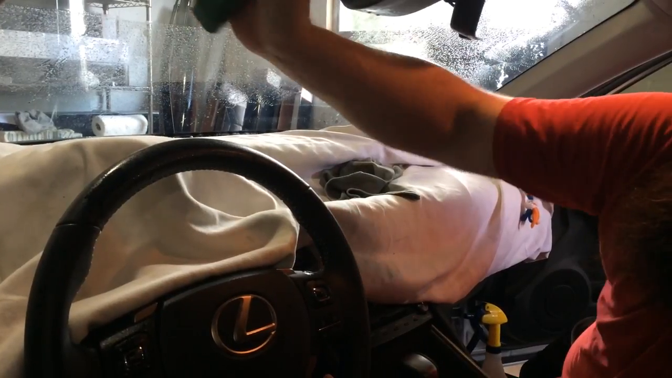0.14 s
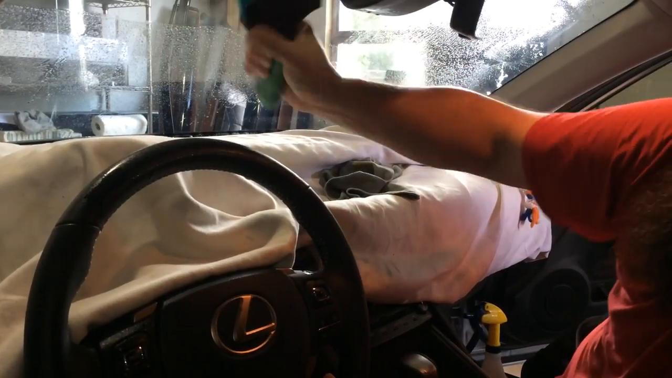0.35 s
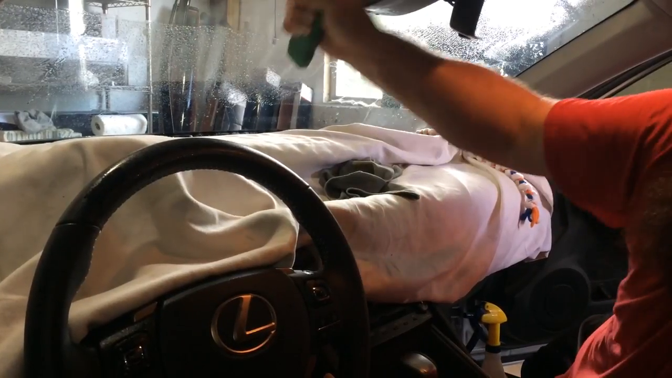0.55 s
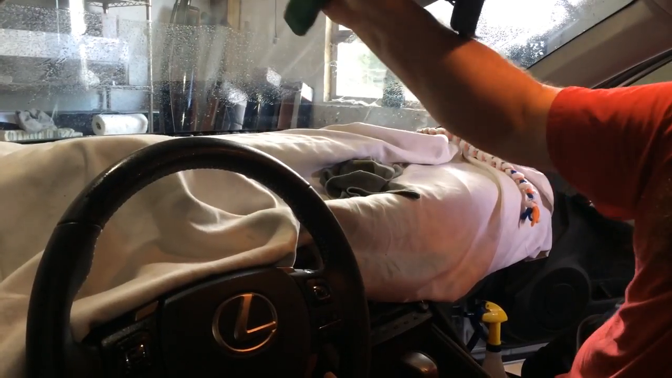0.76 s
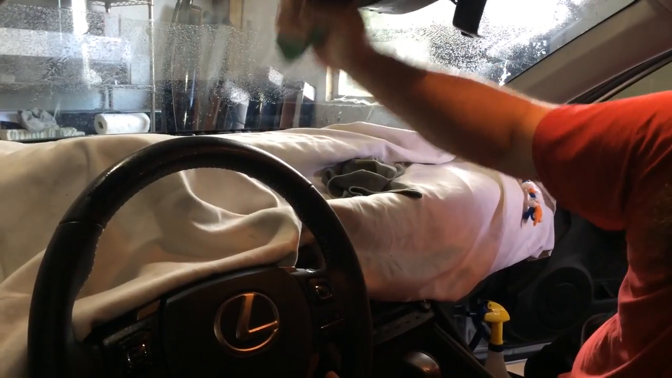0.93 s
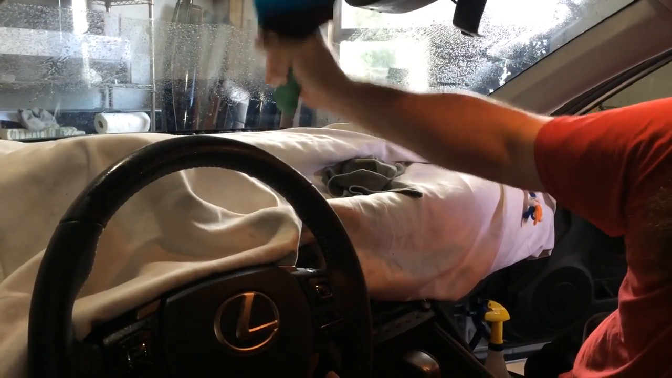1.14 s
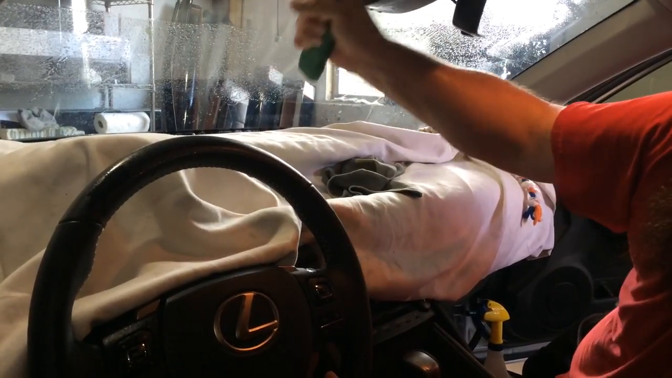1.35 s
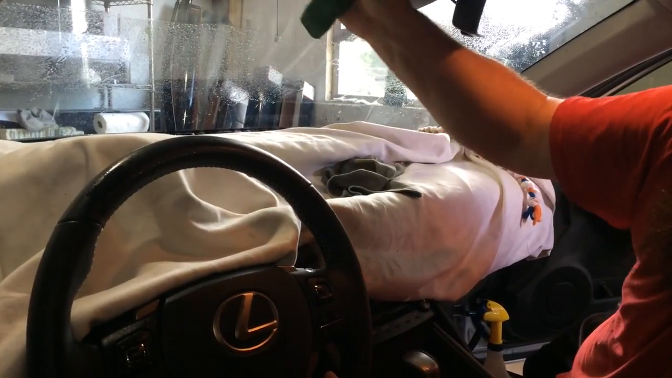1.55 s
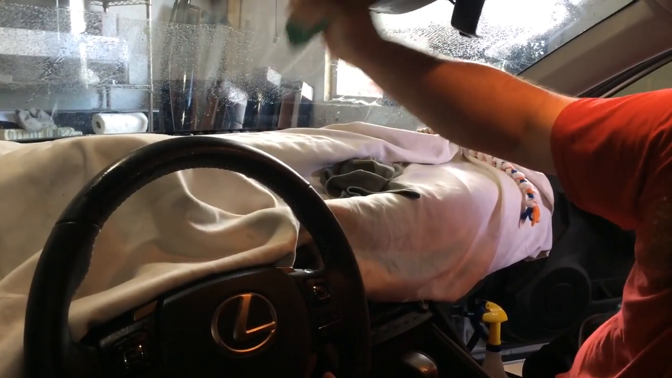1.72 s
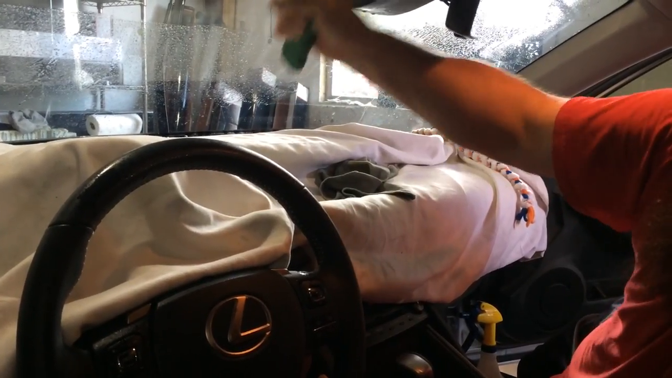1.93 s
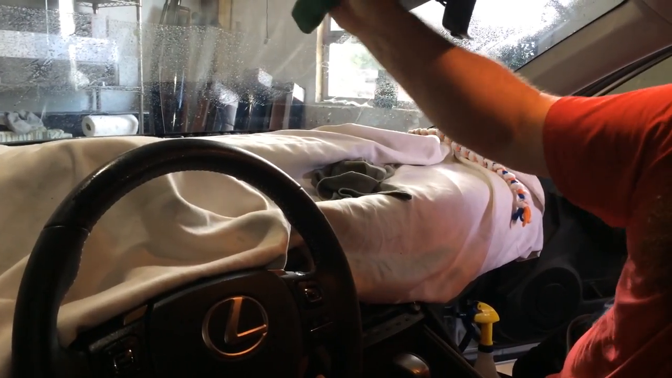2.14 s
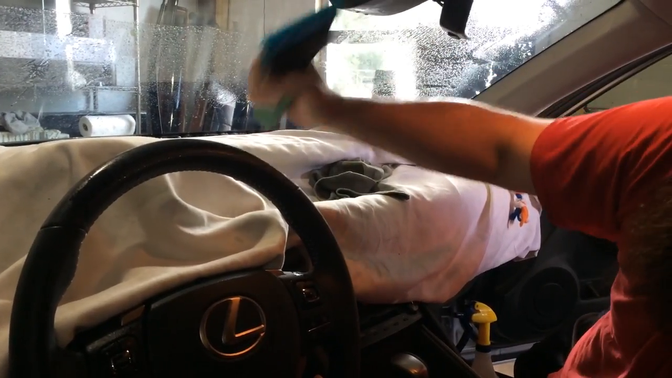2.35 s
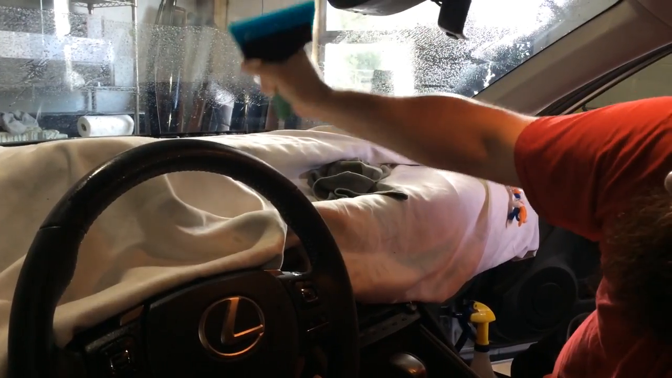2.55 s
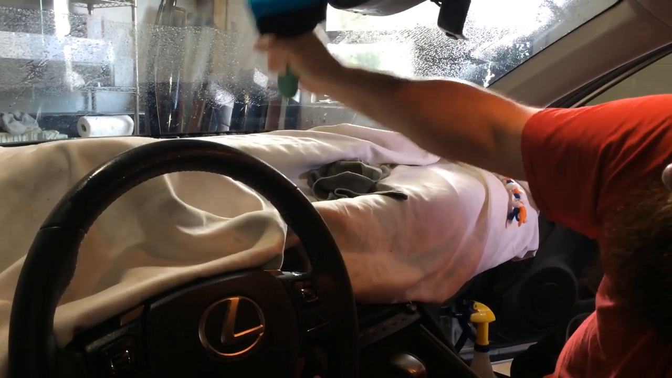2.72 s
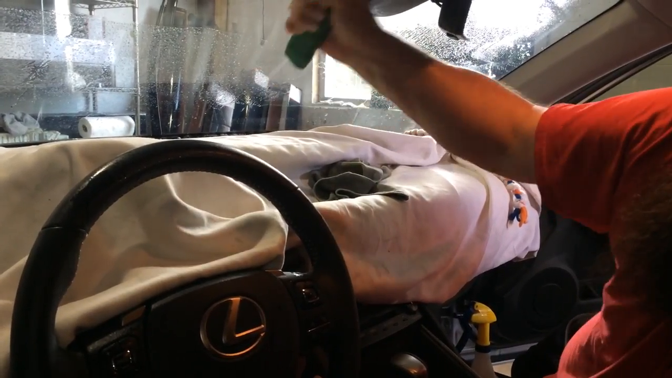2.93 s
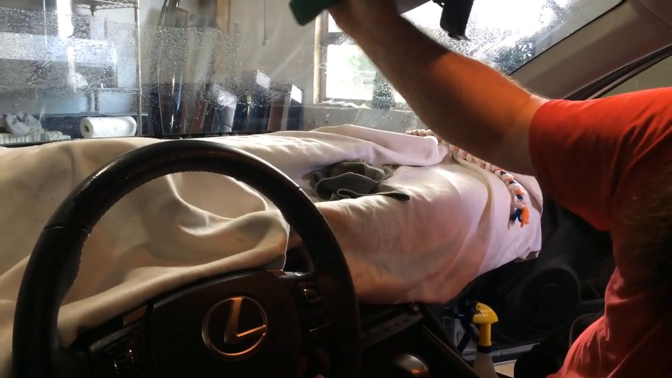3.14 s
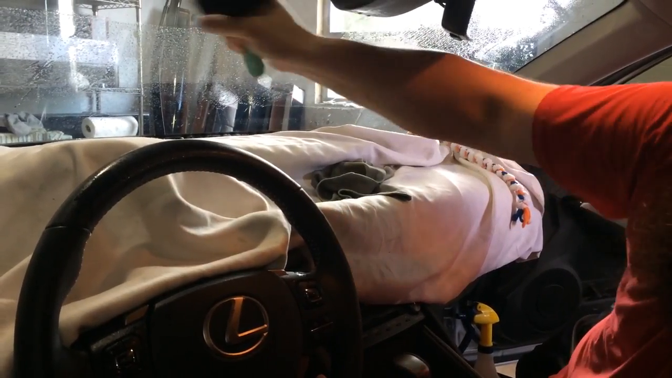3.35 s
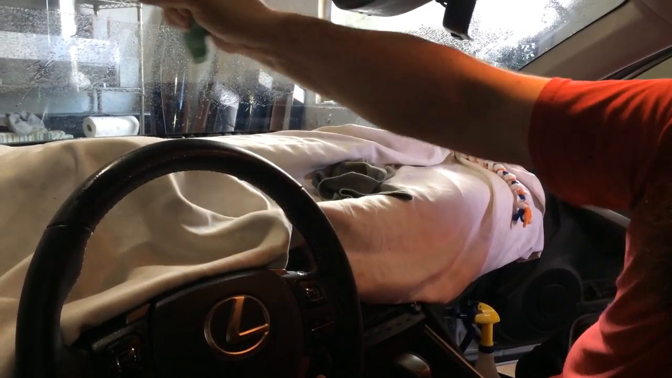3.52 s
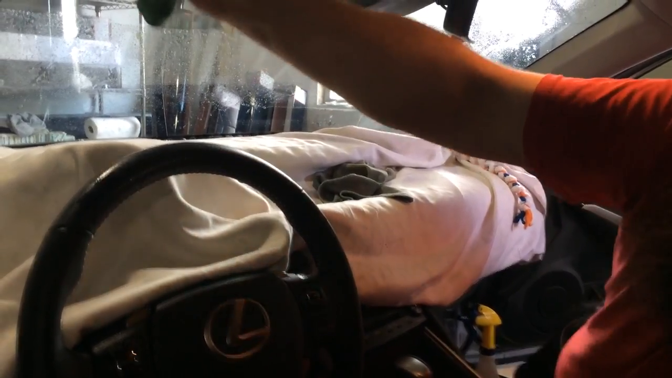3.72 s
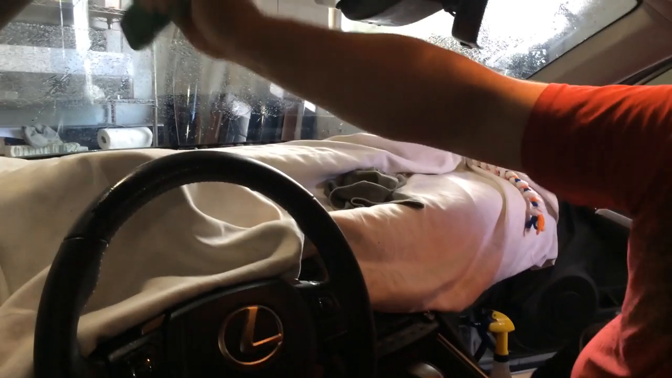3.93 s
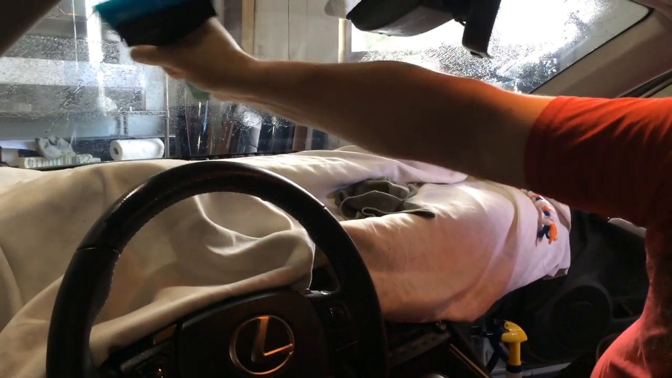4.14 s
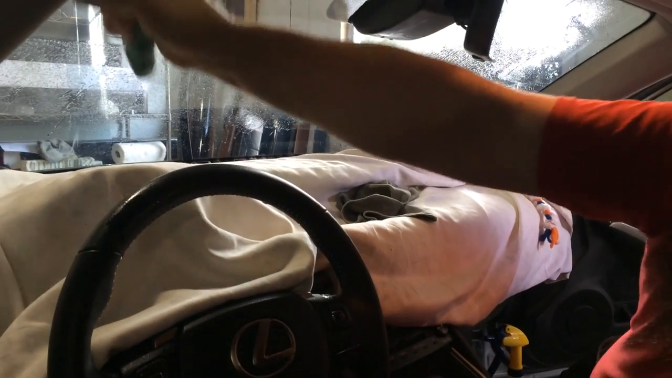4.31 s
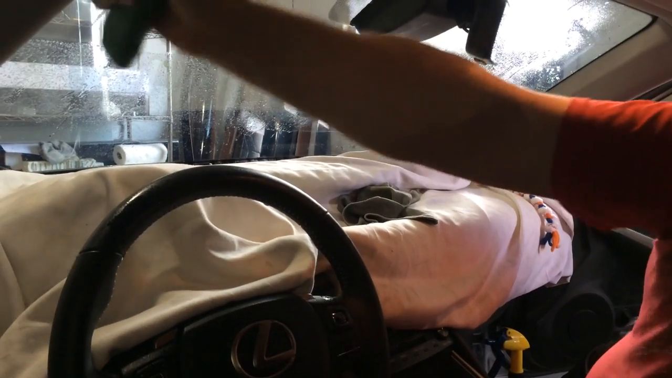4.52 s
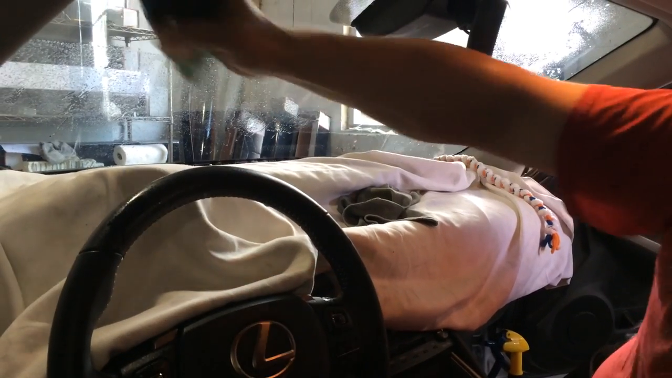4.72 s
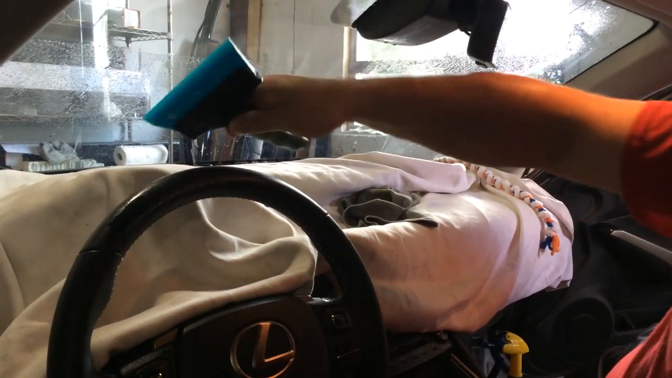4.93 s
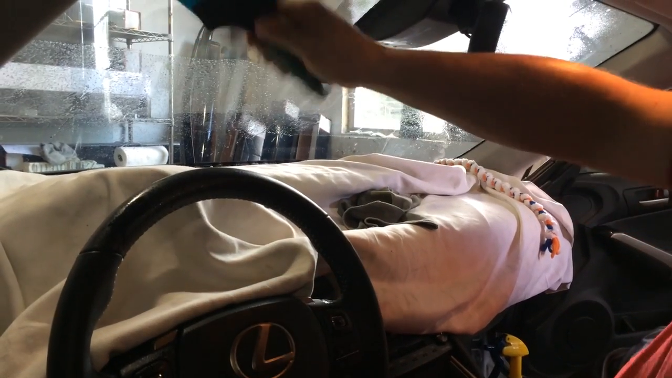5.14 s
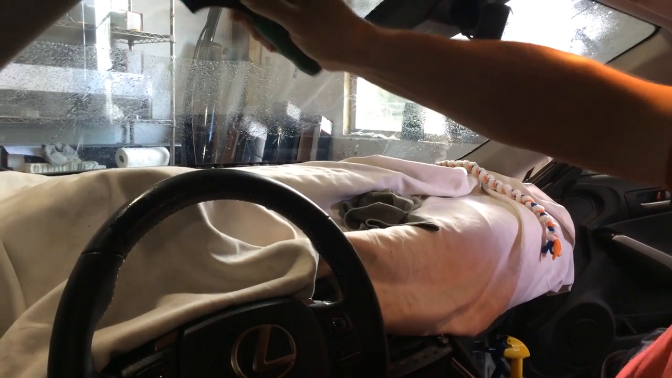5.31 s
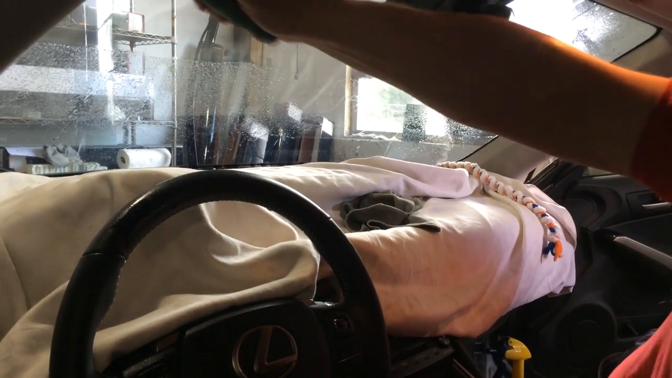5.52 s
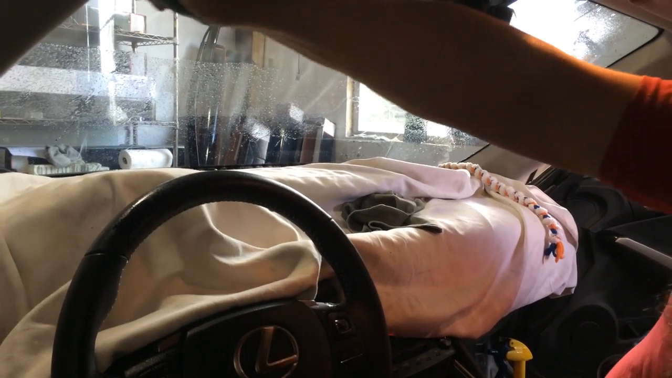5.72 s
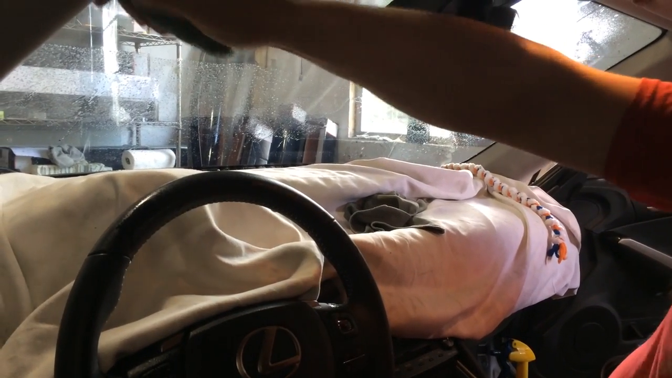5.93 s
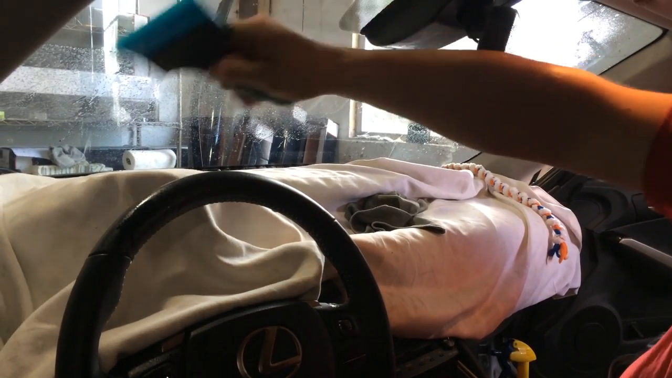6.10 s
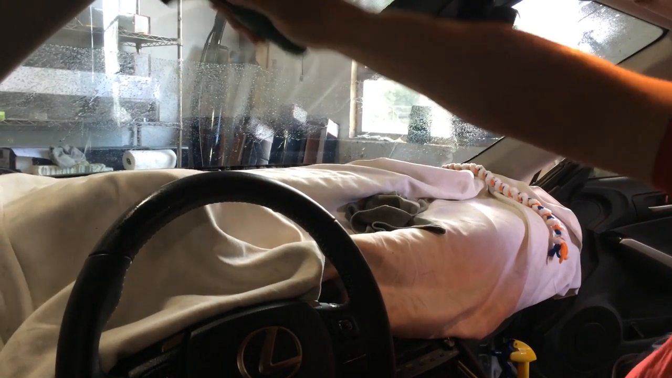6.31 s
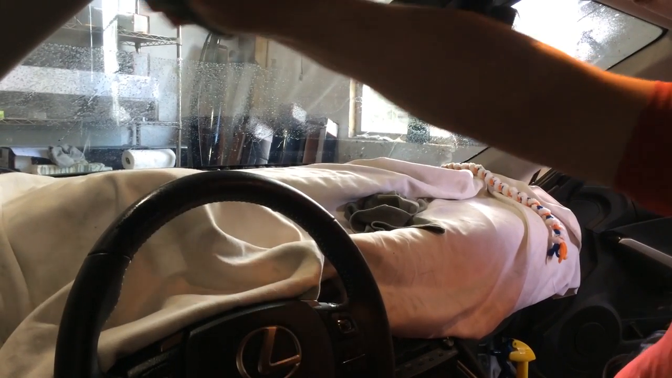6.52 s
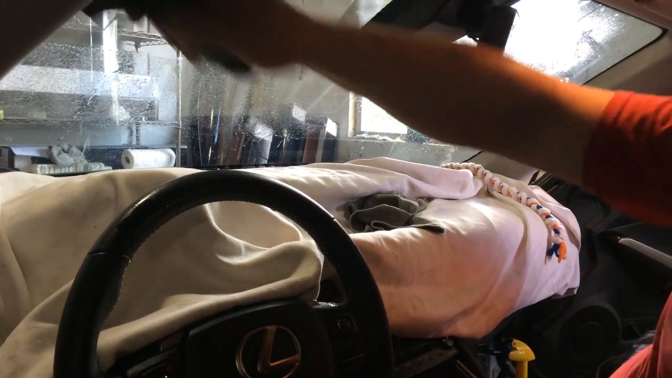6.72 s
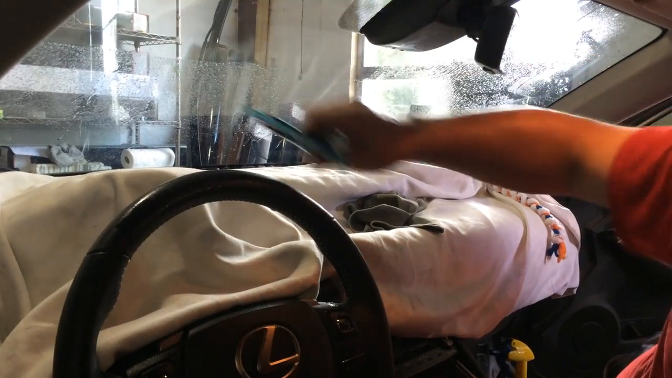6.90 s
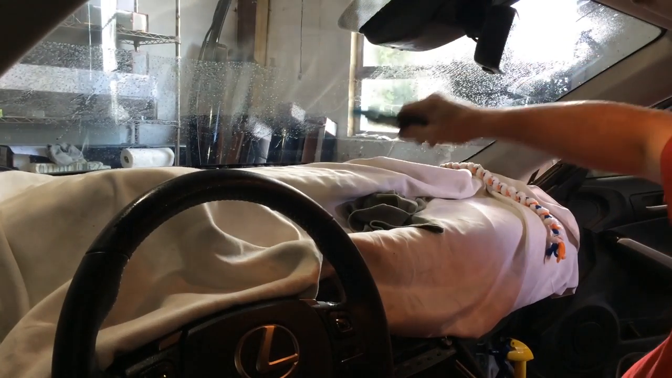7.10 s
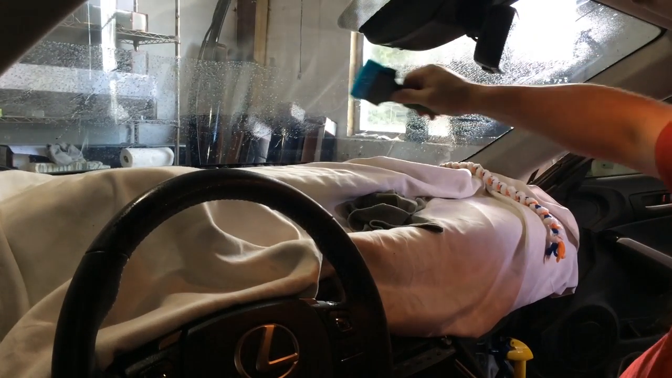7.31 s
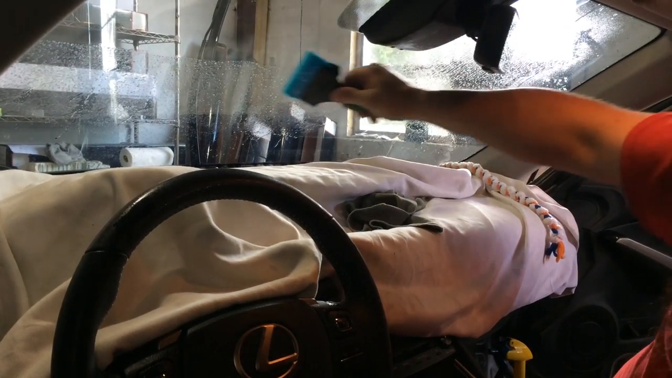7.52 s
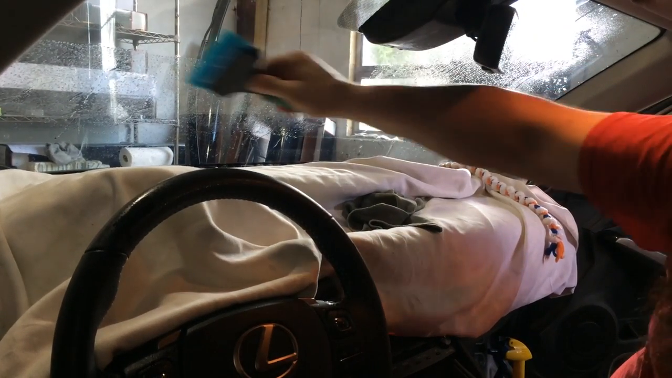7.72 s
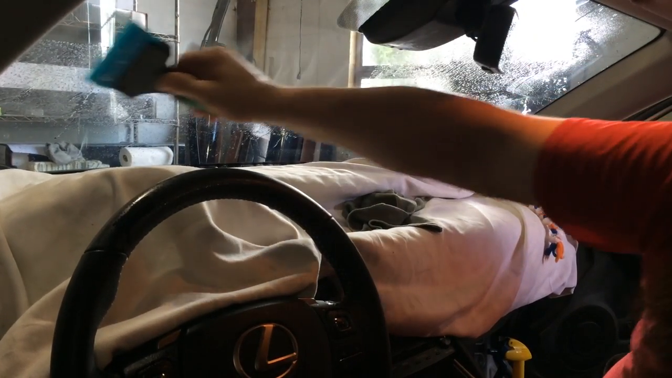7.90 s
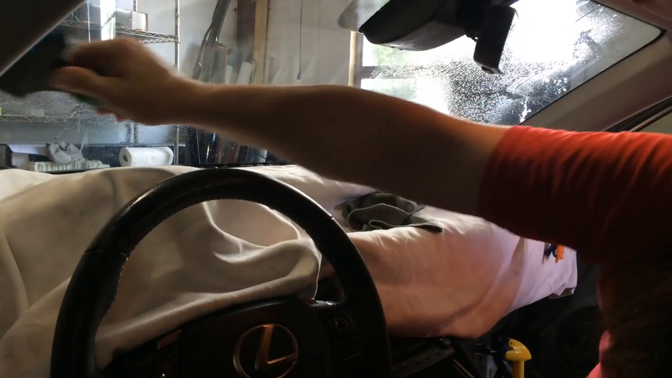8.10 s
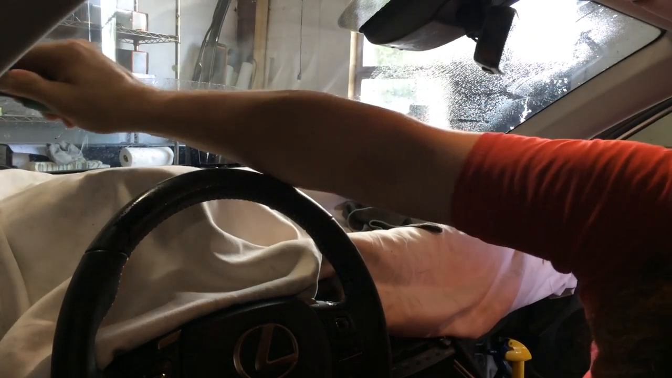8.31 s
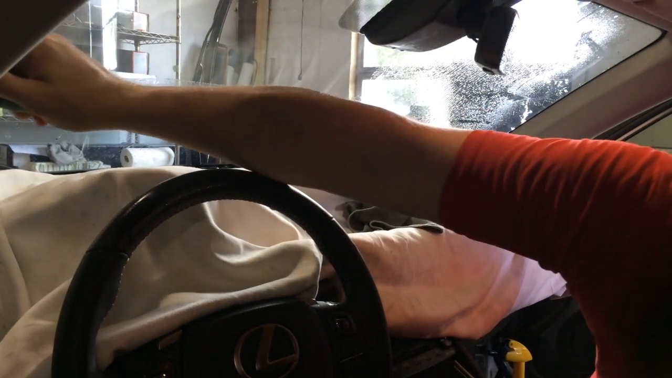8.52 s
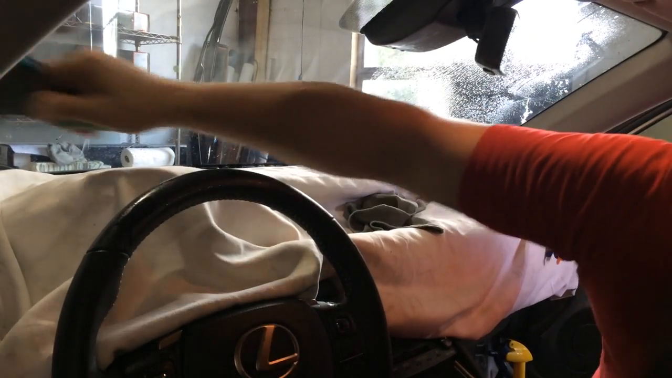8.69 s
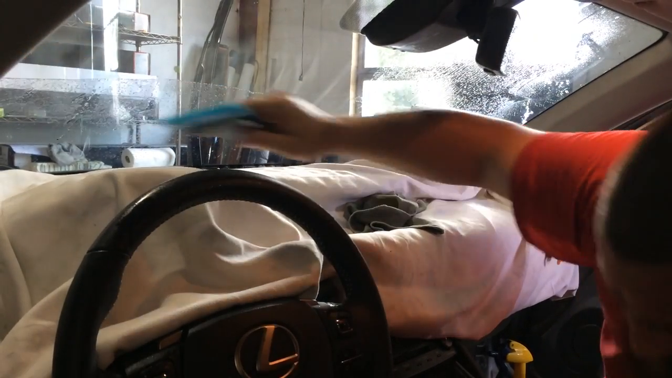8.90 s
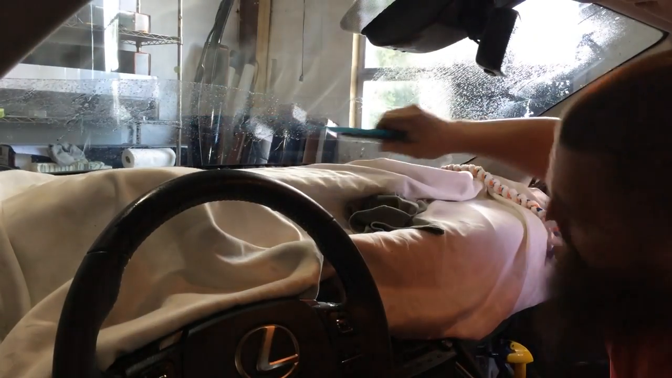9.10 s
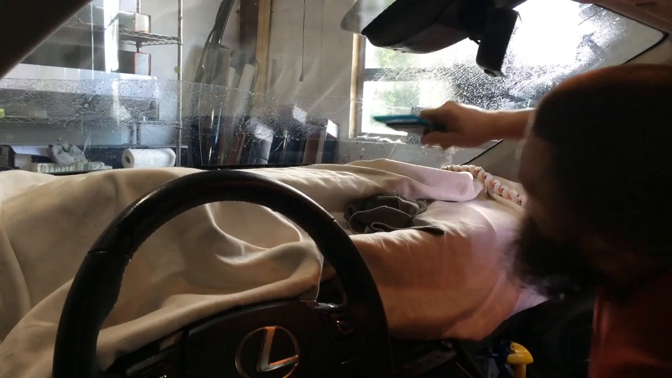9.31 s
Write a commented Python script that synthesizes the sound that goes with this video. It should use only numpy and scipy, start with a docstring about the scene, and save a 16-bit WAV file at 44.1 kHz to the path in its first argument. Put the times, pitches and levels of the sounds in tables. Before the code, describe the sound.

A squeegee taps and thuds on a wet car windshield, swishing and squeaking faintly between strokes over a low fan hum.

```python
"""Squeegee on a windshield, from inside the car

The microphone is in a parked car, where a hand squeegee presses water out from under window film.
Each stroke starts with the hard blade tapping the glass, which thuds into the cabin; then the blade
swishes, judders and squeaks over the wet film. At the end a shirt brushes close to the microphone.
Farther off, a fan hums in the workshop around the car, and the room answers each tap faintly."""
import sys
import numpy as np
from scipy import signal
from scipy.fft import rfft, irfft, next_fast_len
from scipy.io import wavfile
from scipy.ndimage import uniform_filter1d, map_coordinates

SR = 44100
rng = np.random.default_rng(int(sys.argv[2]) if len(sys.argv) > 2 else 0)


def digitize_waveform(pressure):
    """Quantize a signal to 16-bit integers and store it at the path in sys.argv[1].

    Rows of a 2-D input are taken as channels; values are limited to [-1, 1].
    """
    field = np.atleast_2d(pressure).T
    bounded = np.clip(field, -1, 1)
    quanta = np.round(bounded * 32767).astype(np.int16)
    wavfile.write(sys.argv[1], SR, quanta)


N = 412335


def amp(db):
    """Decibels to gain."""
    return 10 ** (np.asarray(db) / 20)


def unit(x):
    """Scale to rms 1."""
    return x / np.sqrt(np.mean(x ** 2) + 1e-20)


def burst(x):
    """Scale a short sound to the energy of 10 ms at rms 1."""
    return x * np.sqrt(SR / 100 / np.sum(x ** 2))


def along(points, hz):
    """Read (frequency, value) points on a log axis."""
    freqs, values = np.transpose(points)
    return np.interp(np.log(hz + 1), np.log(freqs), values)


def tilted(points, slope_db=0):
    """Gain of a spectrum leaned by slope_db per octave above about 1 kHz."""
    return lambda hz: amp(along(points, hz) + slope_db * np.log2(1 + hz / 1000))


def resonant(peaks):
    """Response of a body with resonances (frequency [Hz], width [Hz], level [dB])."""
    return lambda f: sum((-1) ** k * amp(db) * 1j * f * width / (hz * hz - f * f + 1j * f * width)
                         for k, (hz, width, db) in enumerate(peaks))


def filtered(x, response):
    """Pass x through a frequency response."""
    size = next_fast_len(len(x) + SR // 8)
    return irfft(rfft(x, size) * response(np.fft.rfftfreq(size, 1 / SR)), size)[:len(x)]


def noise(n, response):
    """Coloured noise at rms 1."""
    return unit(filtered(rng.standard_normal(n), response))


def causal(x, gain, size=4096):
    """Colour x without any sound ahead of its onset."""
    cepstrum = irfft(np.log(gain(np.fft.rfftfreq(size, 1 / SR)) + 1e-6))
    cepstrum[1:size // 2] *= 2
    cepstrum[size // 2 + 1:] = 0
    return signal.fftconvolve(x, irfft(np.exp(rfft(cepstrum))))[:len(x)]


def wobble(rate):
    """A smooth random curve, rate knots a second."""
    return map_coordinates(rng.standard_normal(int(N * rate / SR) + 4), [np.arange(N) * rate / SR])


def scattered(per_s, db, spread_db):
    """Rows (time [s], level [dB]) of small events at loosely even, random times."""
    draws = enumerate(rng.random(size=(64, 2)))
    return [((k + u) / per_s, db + spread_db * (2 * v - 1)) for k, (u, v) in draws
            if (k + u) / per_s < N / SR]


def add(track, s, x):
    """Mix x into the track from time s."""
    start = round(s * SR)
    x = x[max(-start, 0):max(N - start, 0)]
    track[max(start, 0):][:len(x)] += x


def swell(length):
    """Speed of a short stroke, length seconds wide at half power, peaking two lengths in."""
    t = np.arange(-int(2 * length * SR), int(2 * length * SR)) / SR
    return 2 ** (-abs(2 * t / length) ** 2.5 / 2)


def ring(modes, t, scatter_db):
    """Damped modes, each struck at a slightly new strength."""
    return sum(sign * amp(db + scatter_db * rng.normal() - 60 * t / t60) * np.sin(2 * np.pi * hz * t)
               for hz, db, t60, sign in modes)


# Fan tones: (frequency [Hz], level [dB], wander [Hz])
FAN_TONES = [(148.6, -52.5, 5), (163.2, -53, 3.7), (241.7, -64, 1.4), (409, -75.5, 2.6)]
# Spectra of its rumble and its rush of air: (frequency [Hz], level [dB])
FAN_RUMBLE = [(15, -31), (30, -15), (48, 2.5), (80, -4), (125, 2.5), (175, 2.5), (210, -4), (260, -5.5),
              (330, -9.5), (480, -34), (900, -53)]
FAN_RUSH = [(180, -26.5), (300, 1), (348, -7), (410, -2.5), (446, -7), (508, -8.5), (684, -10), (847, -14),
            (1690, -13.5), (1900, -14.5), (2870, -20), (4620, -27.5), (15400, -44)]


def fan():
    """Out in the workshop, wavering fan tones beat over a rumble and a soft rush of air."""
    hum, t = np.zeros(N), np.arange(N) / SR
    for hz, db, wander_hz in FAN_TONES:
        sway = 1 + 0.55 * (wobble(2 * wander_hz) + 1j * wobble(2 * wander_hz))
        hum += amp(db) * unit(np.real(sway * np.exp(2j * np.pi * hz * t)))
    return hum + amp(-53.5) * noise(N, tilted(FAN_RUMBLE)) + amp(-58) * noise(N, tilted(FAN_RUSH))


# Spectrum of water at the blade: (frequency [Hz], level [dB])
WATER_SPECTRUM = [(300, -19.5), (900, -3.5), (1800, -1.5), (4000, -3), (7000, -4.5), (10000, -9.5),
                  (15500, -15)]


def fizz(speed, tilt_db):
    """Tiny hissing grains that follow a speed curve."""
    grains = amp(2 * unit(uniform_filter1d(rng.standard_normal(len(speed)), size=60)))
    hiss = grains * rng.standard_normal(len(speed))
    return speed * unit(filtered(hiss, tilted(WATER_SPECTRUM, tilt_db)))


# Soft glides over the film: (middle [s], length [s], level [dB])
BLADE_SLIDES = [(0.069, 0.089, -65.5), (3.96, 0.21, -63), (4.473, 0.13, -64), (5.554, 0.43, -71),
                (6.222, 0.15, -77), (8.163, .17, -68.5)]
# Resonances of the sliding blade: (frequency [Hz], width [Hz], level [dB])
BLADE_MODES = [(1710, 81, -2.5), (3170, 290, -11)]


def slides():
    """On well wetted film the blade glides with a soft, hollow hiss."""
    out = np.zeros(N)
    for s, length, db in BLADE_SLIDES:
        speed = swell(length)
        blade = speed * noise(len(speed), resonant(BLADE_MODES))
        add(out, s - 2 * length, amp(db) * (blade + amp(-5) * fizz(speed, tilt_db=-2)))
    return out


# Water spurting from under the film: (middle [s], length [s], level [dB], tilt [dB/octave])
SPURTS = [(0.245, 0.023, -56, 1), (0.77, 0.019, -59, 11), (0.809, 0.03, -55.5, -5),
          (1.535, 0.095, -60.5, 8), (1.548, 0.011, -43.5, 12), (1.714, 0.016, -55.5, -4.5),
          (2.123, 0.061, -61.5, 11), (3.128, 0.046, -63.5, -0.5), (3.803, 0.039, -62.5, -2),
          (5.092, 0.06, -66.5, 3), (8.17, 0.09, -71.5, 2)]


def swishes():
    """Water squeezed along the film fizzes: a few spurts, and faint seeping between them."""
    out = np.zeros(N)
    seeps = [(s, 0.065, db, -1.5) for s, db in scattered(per_s=1.5, db=-72, spread_db=1)]
    for s, length, db, tilt_db in SPURTS + seeps:
        add(out, s - 2 * length, amp(db) * fizz(swell(length), tilt_db))
    return out


def contact(t, direct_db, t60, late_db, late_t60):
    """A pulse reaches the microphone directly, then off glass and dashboard, then from the whole cabin."""
    decay = amp(-60 * t / t60) + amp(late_db - 60 * t / late_t60)
    reflections = burst(rng.standard_normal(len(t)) * decay)
    arrivals = reflections - amp(direct_db) * burst(1. * (t == 0))
    # even out the noise's spectrum so each contact keeps a steady tone colour
    power = uniform_filter1d(abs(rfft(arrivals, 4096)) ** 2, size=71)
    return burst(causal(arrivals, lambda hz: abs(power) ** -.5))


# The loudest water beads: (time [s], level [dB])
LOUD_BEADS = [(0.453, -58.5), (1.545, -56.5), (2.249, -51), (3.232, -55), (4.103, -62.5), (4.975, -61.5),
              (7.851, -63.5), (8.345, -65)]


def beads():
    """Water beads snap at the blade's edge: a few clear ones, one at each bump, faint ones at random."""
    out, t = np.zeros(N), np.arange(SR // 3) / SR
    bumped = [(s, -69) for s, _, _ in HAND_BUMPS]
    for s, db in LOUD_BEADS + bumped + scattered(per_s=1.3, db=-69, spread_db=6):
        snap = contact(t, direct_db=-22, t60=0.024, late_db=-28, late_t60=.08)
        add(out, s, amp(db) * burst(causal(snap, tilted(WATER_SPECTRUM, slope_db=0.5))))
    return out


# Hand and handle meeting the glass: (time [s], bump level [dB], push level [dB])
HAND_BUMPS = [(0.468, -45, -29), (1.707, -42.5, -42), (2.158, -44, -31), (3.524, -63, -24),
              (3.6, -46.5, -35), (5.825, -45, -60), (6.6290, -33.5, -48.5), (6.6393, -35.5, -52),
              (8.590, -41.5, -44)]
# Spectrum of a bump: (frequency [Hz], level [dB])
BUMP_SPECTRUM = [(40, -48), (130, 14), (200, 14.5), (320, 9), (600, -2.5), (1000, -11.5), (2000, -49),
                 (8000, -62)]
# Modes of windshield and cabin air: (frequency [Hz], level [dB], t60 [s], polarity)
DEEP_MODES = [(58.4, -5, 0.23, -1), (68.82, 2.5, 0.082, 1), (94.8, -7, 0.26, -1)]
CABIN_MODES = [(135.6, -9.5, 0.37, -1), (148, -2, .15, 1), (166.6, 0, 0.23, 1), (212, -2, 0.078, -1),
               (332, -14, 0.13, 1)]


def bumps():
    """Dull bumps of the hand push the pane, and the cabin booms softly around the microphone."""
    out, t = np.zeros(N), np.arange(SR // 3) / SR
    for s, db, push_db in HAND_BUMPS:
        touch = contact(t, direct_db=6, t60=.04, late_db=-18, late_t60=.1)
        bump = burst(causal(touch, tilted(BUMP_SPECTRUM)))
        push = ring(DEEP_MODES, t, scatter_db=0.2) + amp(-16.5) * ring(CABIN_MODES, t, scatter_db=5)
        add(out, s, amp(db) * bump + amp(push_db) * push)
    return out


# Spectrum of the hard blade on glass: (frequency [Hz], level [dB])
CRACK_SPECTRUM = [(100, -22), (280, -5), (450, 0.5), (900, 4), (1700, 0.5), (2300, -1.5), (3400, -6),
                  (5000, -12.5), (6400, -12.5), (9300, -19), (12000, -25), (15500, -34.5)]


def crack(t, tilt_db, spot_hz):
    """Hard contact of the blade; each spot on the glass favours its own range."""
    spot = lambda hz: amp(6 / (1 + (4 * np.log2((hz + 1) / spot_hz)) ** 2))
    hit = contact(t, direct_db=-7.5, t60=0.021, late_db=-8.5, late_t60=0.066)
    return burst(causal(hit, lambda hz: tilted(CRACK_SPECTRUM, tilt_db)(hz) * spot(hz)))


# One blade landing per stroke: (time [s], click level [dB], tilt [dB/octave], struck spot [Hz],
# thud level [dB], deep modes against the thud [dB], knock level [dB])
LANDINGS = [(0.5014, -30, 3, 790, -22.5, 1, -41), (1.2499, -26.5, 1.5, 820, -17.5, 1, -29),
            (1.8994, -22.5, 0, 1590, -18, -1, -37), (2.6576, -32, 3.5, 1180, -29, 3, -40.5),
            (3.4110, -16, 4, 1470, -18.5, 2, -29), (4.1990, -23, 0.7, 1150, -26.5, -1, -44),
            (5.2598, -27, -3, 570, -21, -1.5, -25.5), (6.2946, -24.5, 2, 970, -24.5, -6, -27.5),
            (7.3225, -28, -3.5, 830, -22.5, 3, -29.5)]
# The laminated pane's ring and its hollow knock: (frequency [Hz], level [dB], t60 [s], polarity)
GLASS_MODES = [(564.6, -3, 0.11, 1), (865, 5.5, 0.062, 1), (980, 7, 0.052, -1), (1290, 4, 0.046, 1),
               (1580, -2, .04, -1), (2000, -7, 0.052, 1), (2770, -18, .025, -1), (3300, 6, 0.015, 1)]
KNOCK_MODES = [(269, -1.5, 0.089, 1), (353, -1.5, 0.067, -1)]


def taps():
    """The blade lands with a slap, crack and short ring; the pane knocks and pumps the cabin air."""
    out, t = np.zeros(N), np.arange(SR // 3) / SR
    # a flat landing pushes the pane in, and it springs back within a millisecond
    flex = (t - .0004) / 0.0001
    slap = burst(flex * np.exp(-flex ** 2 / 2))
    for s, click_db, tilt_db, spot_hz, thud_db, deep_db, knock_db in LANDINGS:
        glass = burst(ring(GLASS_MODES, t, scatter_db=3.5))
        slap_db = -3.5 + 6.6 * min(tilt_db, 0)  # a slanted, duller landing slaps less
        click = burst(crack(t, tilt_db, spot_hz) + amp(slap_db) * slap + amp(-7.5) * glass)
        thud = ring(CABIN_MODES, t, scatter_db=1.85)
        thud += amp(deep_db) * ring(DEEP_MODES, t, scatter_db=0.25)
        knock = ring(KNOCK_MODES, t, scatter_db=2)
        add(out, s, amp(click_db) * click + amp(thud_db) * thud + amp(knock_db) * knock)
    return out


# Decay of the room around the car: (frequency [Hz], t60 [s])
WORKSHOP_DECAY = [(100, 0.45), (1500, 0.4), (6000, 0.62), (15000, 0.19)]


def workshop(x):
    """The room outside the car rings on, its highest treble dying first."""
    hz, t, spectra = signal.stft(rng.standard_normal(SR), SR, nperseg=256)
    decay = amp(-60 * t / along(WORKSHOP_DECAY, hz)[:, None])
    tail = signal.istft(spectra * decay, SR, nperseg=256)[1]
    return signal.fftconvolve(x, tail / np.linalg.norm(tail))[:N]


# Resonances under the rubbing blade: (frequency [Hz], width [Hz], level [dB])
PANE_MODES = [(259, 73, 8.5), (434, 79, 8), (620, 83, 6), (930, 220, -1), (1290, 69, -3), (1730, 120, -10)]


def stick_slip(speed, rough, middle_hz, glide=0, sag=0):
    """Rubber slips shake the pane; their rate glides, and sags at both ends, by so many octaves."""
    n = len(speed)
    place = np.clip(np.linspace(-2, 2, n), -1, 1)
    jitter = unit(uniform_filter1d(rng.standard_normal(n), size=500))
    rate_hz = middle_hz * 2 ** (glide * place - sag * place ** 2) * (1 + .12 * rough * jitter)
    slips = np.diff(np.floor(np.cumsum(rate_hz) / SR), prepend=0)
    force = unit(slips * (1 + rough * rng.standard_normal(n)))
    force += .5 * rough * rng.standard_normal(n)
    sharpness = lambda hz: amp(2 * np.log2(1 + hz / middle_hz))  # rises 2 dB per octave
    return speed * unit(filtered(force, lambda hz: resonant(PANE_MODES)(hz) * sharpness(hz)))


# Mid-stroke judders: (middle [s], length [s], level [dB], glide [octaves/length])
RUBBER_JUDDERS = [(0.636, 0.073, -48.5, -0.47), (2.073, 0.086, -52.5, .3), (2.861, .11, -49.5, -.15),
                  (3.07, 0.06, -47, 0.26)]


def judders():
    """Where the film is drier the rubber sticks and slips in a low judder, its grip wavering."""
    out = np.zeros(N)
    for s, length, db, glide in RUBBER_JUDDERS:
        speed = swell(length)
        grip = unit(amp(2 * wobble(rate=70.5)[:len(speed)]))
        rubber = grip * stick_slip(speed, rough=0.43, middle_hz=264, glide=glide)
        add(out, s - 2 * length, amp(db) * (rubber + amp(-13.5) * fizz(speed, tilt_db=-8.5)))
    return out


# Wet squeaks: (middle [s], length [s], rubber level [dB], water level [dB], roughness [0-1])
END_SQUEAKS = [(0.952, .04, -47, -52.5, 0.45), (2.139, 0.021, -53, -56, .77),
               (2.265, 0.018, -42.5, -50, 0.2), (3.235, .017, -57, -50, .05), (4.509, .02, -49, -60, 0.4),
               (4.605, 0.016, -52, -56, 0.67)]


def squeaks():
    """As a stroke ends the rubber slips faster, squeaks and flicks water."""
    out = np.zeros(N)
    for s, length, db, water_db, rough in END_SQUEAKS:
        speed = swell(length)
        rubber = stick_slip(speed, rough, middle_hz=459, sag=.17)
        add(out, s - 2 * length, amp(db) * rubber + amp(water_db) * fizz(speed, tilt_db=-4.5))
    return out


# A corner of the blade touching the glass: (time [s], level [dB])
CORNER_HITS = [(1.2465, -41), (1.2566, -29), (1.91, -29.5), (2.653, -54), (2.6674, -35.5), (4.1905, -44),
               (6.2870, -47)]


def corners():
    """A corner grazes just before a landing or falls just after it; the harder, the brighter."""
    out, t = np.zeros(N), np.arange(SR // 3) / SR
    for s, db in CORNER_HITS:
        add(out, s, amp(db) * crack(t, tilt_db=0.27 * (db + 34.5), spot_hz=860))
    return out


# Squeals of wet rubber: (middle [s], length [s], level [dB], frequency [Hz])
EDGE_SQUEALS = [(2.257, 0.011, -54.5, 5500), (3.232, .018, -57, 5790), (8.698, .08, -66.5, 3260),
                (8.959, 0.038, -57.5, 6200)]


def squeals(q=12):
    """Now and then the gliding edge squeals in one thin, high band."""
    out = np.zeros(N)
    for s, length, db, hz in EDGE_SQUEALS:
        speed = swell(length)
        add(out, s - 2 * length, amp(db) * speed * noise(len(speed), resonant([(hz, hz / q, 0)])))
    return out


# Contour of the clothing noise as the worker leans in: (time [s], level [dB])
SHIRT_CONTOUR = [(8.75, -83), (8.974, -59.5), (9.004, -68), (9.178, -63), (9.238, -65.5), (9.35, -58)]


def rustle(gain_db=2):
    """The worker's shirt brushes along close to the microphone."""
    s, db = np.transpose(SHIRT_CONTOUR)
    speed = amp(np.interp(np.arange(N) / SR, s, db + gain_db, left=-np.inf))
    return fizz(speed, tilt_db=1.5)


def scene():
    """From the cabin, in mono: the work on the glass nearby, its faint echo and the fan outside."""
    knocks = taps() + corners() + bumps()
    water = beads() + swishes()
    rubbing = judders() + squeaks() + slides() + squeals()
    work = knocks + water + rubbing + rustle()
    return (work + amp(-23) * workshop(work) + fan())[None]


def record(dry, low_hz=12, top_hz=15500):
    """The microphone thins out the lowest bass and keeps nothing above its band limit."""
    response = lambda hz: 1j * hz / (1j * hz + low_hz) / np.sqrt(1 + (hz / top_hz) ** 200)
    return np.array([filtered(x, response) for x in dry])


dry = scene()
out = record(dry)
digitize_waveform(out)
```